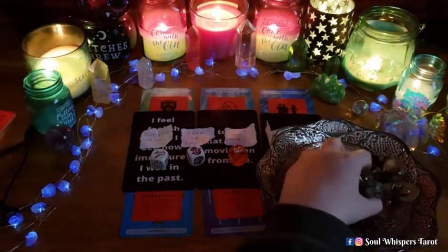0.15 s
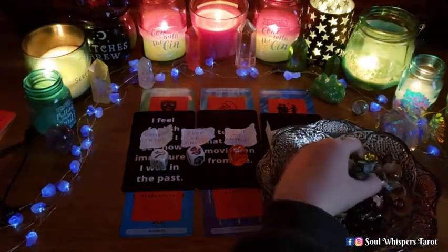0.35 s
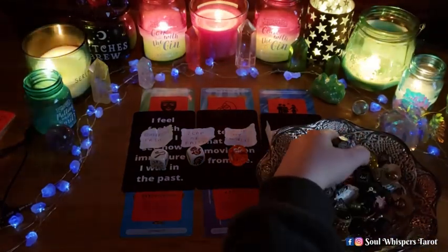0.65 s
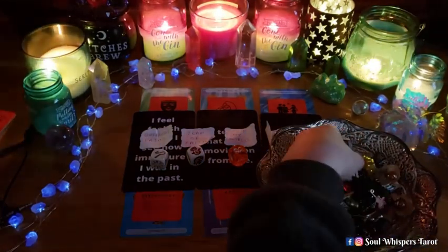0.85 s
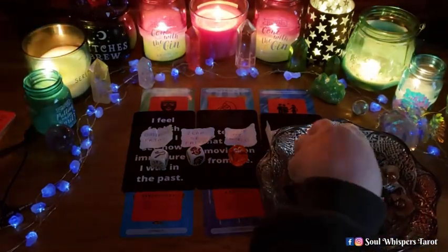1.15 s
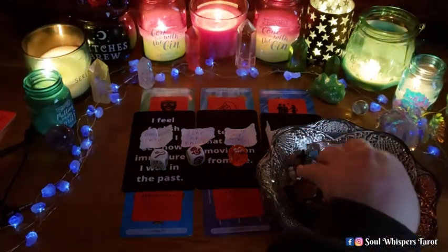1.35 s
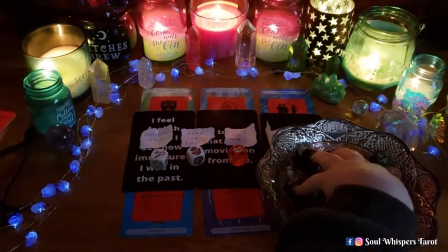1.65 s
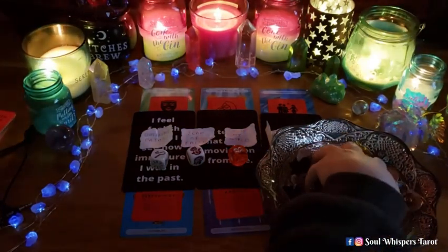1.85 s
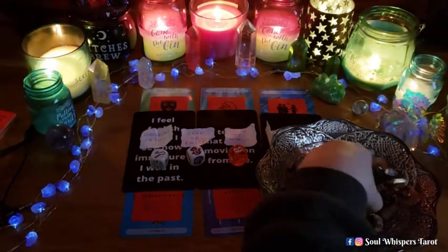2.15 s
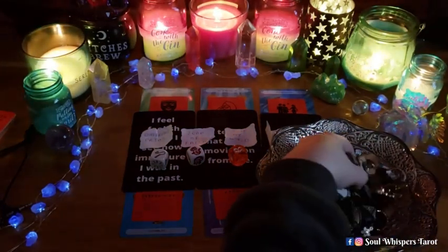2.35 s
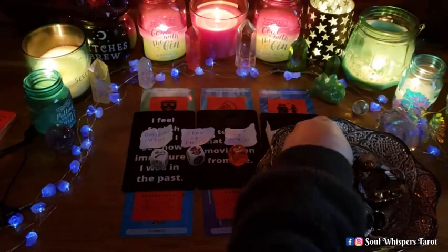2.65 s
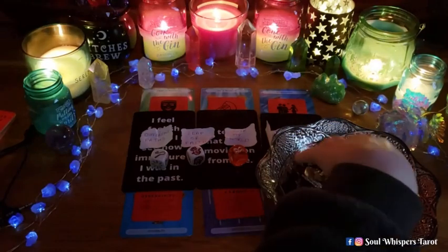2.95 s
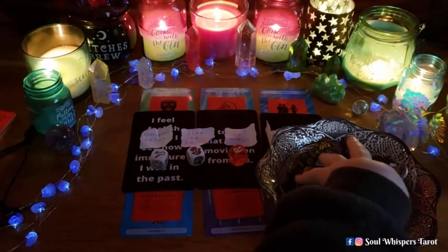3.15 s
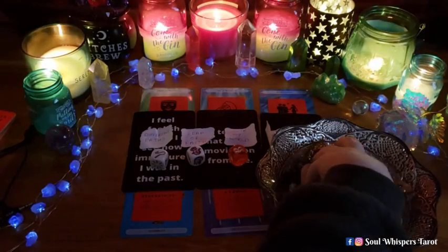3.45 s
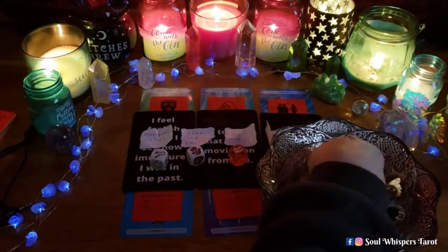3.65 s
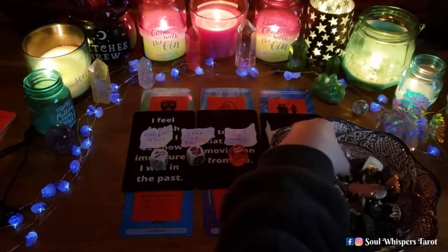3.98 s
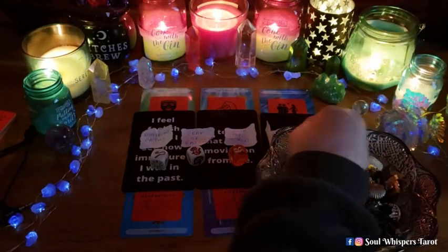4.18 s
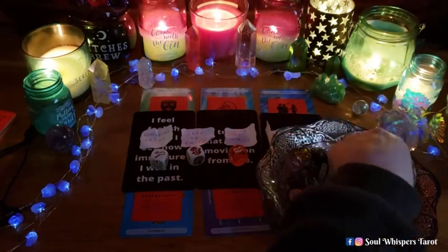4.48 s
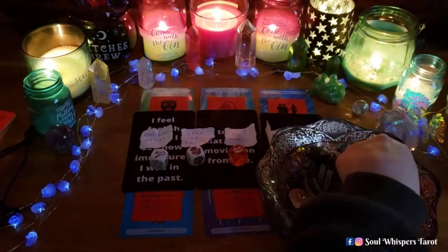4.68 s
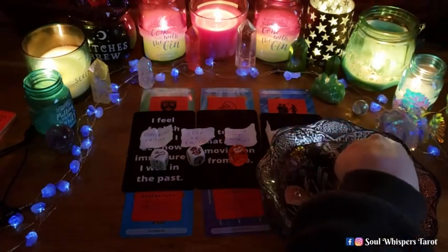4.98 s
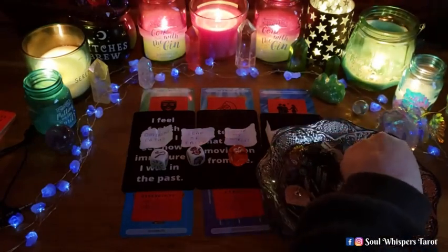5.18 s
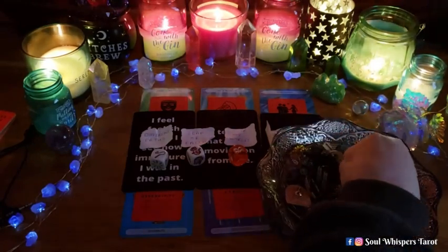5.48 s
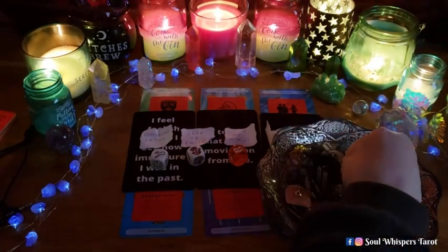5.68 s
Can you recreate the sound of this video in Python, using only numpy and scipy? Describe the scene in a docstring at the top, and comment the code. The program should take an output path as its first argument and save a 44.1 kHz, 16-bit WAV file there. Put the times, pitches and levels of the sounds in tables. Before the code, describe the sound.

Crisp, dense tinkling of tiny trinkets being stirred starts at once, loud, then dips around half a second and again near one and a half. Strokes keep returning, with single knocks, short rattles and scraping bead clinks over clacking stones and a soft wooden thud. After about four and a half seconds it thins to lighter fidgeting. Recorded close in stereo, stronger on the left, dry little room with faint hiss.

```python
"""Tinkling charms and clacking stones: a hand stirs them in a glass bowl on a wooden table, close to
a stereo microphone. Scattered tiny knocks excite short bundles of modes in charms and stones, the
bowl's ringing modes and the table's rumble; charms jingle and rattle, hollow beads scrape, and
single stronger knocks ring out. The bowl stands nearer the left port, in a small quiet room."""
import sys
import numpy as np
from scipy import signal
from scipy.fft import rfft, irfft, next_fast_len
from scipy.io import wavfile

SR = 44100
rng = np.random.default_rng(int(sys.argv[2]) if len(sys.argv) > 2 else 0)


def amplitude_ratio(level_db):
    """Convert a level in decibels to the matching linear amplitude (field) ratio."""
    exponent = np.asarray(level_db, float) / 20
    return 10 ** exponent


def transcribe(u):
    """Save the signal u as a 16-bit wav file named by the first command-line argument.

    u: samples, shape (n,) or (channels, n), limited to [-1, 1]; the rate is SR.
    q: integer samples, one column per channel.
    """
    v = np.clip(np.atleast_2d(u).T, -1, 1)
    q = np.round(v * 32767).astype(np.int16)
    wavfile.write(sys.argv[1], SR, q)


N = 256662  # length in samples

# Room and microphone noise. Each row: frequency in Hz, relative level in dB per Hz.
HUSH_SPECTRUM = [(30, -14.5), (121, 1.5), (526, -20), (4650, -25.5), (16000, -21)]
HUSH_DB = -62.5  # over both ports together, before the left one is favoured
# How alike the two ports hear a noise. Each row: frequency in Hz, likeness from 0 to 1.
PORT_LIKENESS = [(60, 0.73), (240, 0.86), (950, 0.06), (3770, 0.0091), (15000, 0.03)]
# The bowl stands nearer the left port. Each row: frequency in Hz, left minus right in dB.
LEFT_LEAD = [(60, 12), (180, 9.5), (550, 10), (1650, 7.5), (4970, 5), (15000, 12.5)]

# Pushes of the hand through the heap. Each row: time of the height in seconds, charm level in dB,
# swell before it in seconds, carry after it in seconds, stones moved in dB relative to the charms.
PUSHES = [(0.0, -15.5, .01, 0.08, -11.5), (0.132, -14.5, 0.0068, 0.016, -14), (0.339, -20, 0.17, 0.15, -12),
          (0.544, -29, 0.0037, 0.092, -8), (.70, -34, 0.051, 0.098, -12.5),
          (0.9, -20.5, 0.11, 0.048, -13.5), (1.084, -15.5, 0.11, 0.028, -11.5),
          (1.199, -25.5, 0.005, 0.0052, -12.5), (1.621, -25, 0.072, 0.12, -9), (1.78, -24, 0.11, 0.055, -9),
          (1.938, -19, 0.11, 0.022, -11), (2.019, -21.5, 0.017, 0.069, -9),
          (2.19, -19.5, 0.1, 0.058, -12.5), (2.342, -23, 0.13, 0.13, -10.5),
          (2.57, -30.5, 0.056, 0.022, -7.5), (2.604, -22, 0.0054, 0.0078, -15),
          (2.642, -21.5, 0.0055, 0.034, -11.5), (2.74, -21, 0.0065, .05, -18),
          (2.849, -15.5, 0.056, 0.1, -15.5), (3.063, -38.5, 0.0075, 0.0024, -13),
          (3.199, -21.5, 0.059, 0.38, -10.5), (3.434, -22.5, 0.038, 0.15, -12),
          (3.684, -20, 0.086, 0.042, -12), (3.851, -21, 0.1, 0.29, -11.5), (4.102, -16, 0.052, 0.12, -18),
          (4.273, -24.5, 0.0056, 0.04, -10), (4.43, -44.5, 0.0038, 0.091, 4),
          (4.59, -22.5, 0.11, 0.12, -11.5), (4.745, -26.5, 0.038, 0.11, -10), (4.92, -30, 0.1, 0.099, -9.5),
          (5.118, -34.5, 0.075, 0.04, -7), (5.258, -28, 0.062, 0.029, -10.5),
          (5.39, -28, 0.023, 0.0078, -10.5), (5.471, -39, 0.031, 0.046, -7.5),
          (5.579, -36.5, 0.046, 0.0087, -9), (5.659, -25.5, 0.062, 0.012, -13),
          (5.759, -32, 0.0055, 0.0059, -14)]
ATTACK_DB_PER_S, SWELL_DB_PER_S, SAG_DB_PER_S = 1296, 54.5, 51.5  # setting in, swelling, carrying on
# coming to rest after a push
CHARM_STOP_DB_PER_S, STONE_STOP_DB_PER_S, TABLE_STOP_DB_PER_S = 287.5, 208.5, 175.5

# Colour of the charms. Each row: frequency in Hz, relative level in dB per Hz.
CHARM_SPECTRUM = [(2650, -21.5), (4500, -6.5), (5210, -13), (6450, -4), (7320, -11), (9310, -3.5),
                  (11700, -1.5), (15700, -3.5)]
# Colour of stones on glass. Each row: frequency in Hz, relative level in dB per Hz.
CLACK_SPECTRUM = [(240, -78.5), (400, -4.5), (781, -6), (1280, -1.5), (1410, -7), (1700, -1), (2010, -7.5),
                  (4470, -1), (5500, -7), (7150, -41.5)]
# Mode pitches of the glass bowl. Each entry: frequency in Hz.
BOWL_HZ = [1085, 1253, 1726, 2820, 3010, 4386, 6035, 7875, 8547, 9424, 10310, 11740]
# The same bowl modes. Each row: relative level in dB, undamped 60 dB decay time in seconds.
BOWL_RINGS = [(-27.5, 0.32), (-17.5, 0.13), (-8, 0.088), (-11.5, 0.066), (-4.5, 0.057), (-4, .1),
              (-13, 0.13), (-9.5, 0.063), (-9.5, 0.042), (-5, 0.11), (-3, 0.098), (-1.5, 0.11)]
# Modes of the table top. Each row: frequency in Hz, relative level in dB, 60 dB decay time in seconds.
TABLE_MODES = [(109, -4, 0.14), (123, 2, 0.086), (187.9, 2.5, 0.12), (229, -10.5, 0.046), (364.2, -5, 0.15),
               (442, 1, 0.076), (561.2, -6.5, 0.21)]
DEEP_HZ = 150  # modes below this are driven by the wrist
# The wrist leans on the table. Each row: time in seconds, relative drive of the deepest modes in dB.
WRIST_LEAN = [(0, -9), (.9, 0.5), (1.6, -3), (3.0, 1.5), (4.0, 1), (5.2, -1), (5.802, 5)]

# Single knocks. Each row: time in seconds, strength in dB, pitch of the struck piece in Hz,
# its ring in dB relative to the strength, blow on the glass in dB relative to the strength.
KNOCKS = [(0.1263, -3.5, 4385, -6, -4.5), (0.27, -11.5, 4385, -4, -6.5), (1.074, 3.5, 10470, -13.5, -19),
          (1.198, -14.5, 13040, -1, -33), (1.269, -16, 2820, -23, -16.5), (1.506, -39.5, 14200, -24.5, -18),
          (1.615, -13.5, 4323, -13, -6.5), (2.017, -8, 4387, -7, -3.5), (2.6017, -12, 9650, -5, -24),
          (2.639, 6.5, 7010, -27, -33), (2.7356, -2.5, 13600, -14, -20), (2.8022, -1.5, 13700, -13, -17.5),
          (3.052, -28, 13200, -16, -29), (3.19, -4.5, 13200, -14, -28), (4.051, -3.5, 13300, -11, -37),
          (4.2707, -25.5, 1117, -5, 1.5), (4.394, -38.5, 4440, -9, 4), (4.4265, -21.5, 4230, -22, -6),
          (5.7543, -12, 15050, -9, -49)]
# One charm rattling for a while. Each row: start in seconds, end in seconds, frequency in Hz,
# 60 dB decay time in seconds, level in dB relative to the charms' stirring curve.
RATTLES = [(.5375, .546, 8850, .02, 9), (.64, .69, 11140, .12, 6), (.713, .75, 11140, .12, 1.5),
           (3.822, 3.85, 4386, .04, -9), (1.04, 1.14, 9140, 0.018, -6.5), (1.075, 1.15, 6330, 0.028, -5),
           (2.3, 2.46, 14640, 0.025, -5.5), (2.6, 2.67, 7180, 0.013, -4), (2.735, 2.81, 7020, 0.014, -6),
           (2.9, 3.03, 10320, 0.045, -12), (4.052, 4.2, 6960, 0.012, -10), (4.15, 4.26, 13280, .03, -5),
           (5.752, 5.79, 14800, .04, -3.5)]
# Hollow beads scraping under the hand. Each row: start in seconds, end in seconds,
# middle pitch in Hz, strongest clink in dB relative to the charms' stirring curve.
BEAD_SPELLS = [(0.568, .72, 4190, -9.5), (.86, 0.962, 3890, -9), (2.169, 2.474, 3725, -8.5),
               (2.686, 2.731, 3790, -7.5), (3.41, 3.53, 3816, -7.5), (3.534, 3.85, 3910, -10.5),
               (3.92, 3.989, 3800, -11), (4.487, 4.65, 3780, -7), (4.669, 4.95, 3670, -13),
               (5.589, 5.704, 3660, -12)]


def rms_one(x):
    """Scale to rms 1."""
    return x / np.sqrt(np.mean(x ** 2) + 1e-20)


def at_hz(points, hz):
    """Read a spectrum on a log-frequency axis."""
    table_hz, values = np.array(points).T
    return np.interp(np.log(np.maximum(hz, 1)), np.log(table_hz), values)


def coloured(x, spectrum):
    """Weight a sound by a spectrum in dB."""
    size = next_fast_len(N + 4096)
    gain = amplitude_ratio(at_hz(spectrum, np.fft.rfftfreq(size, 1 / SR)))
    return irfft(rfft(x, size) * gain, size)[..., :N]


def pair(size):
    """Noise at two ports, as spectra: mid and side are weighted by the ports' likeness at each pitch."""
    mid, side = rfft(rng.standard_normal((2, size)))
    alike = np.clip(at_hz(PORT_LIKENESS, np.fft.rfftfreq(size, 1 / SR)), 0, 1)
    return np.sqrt(1 + alike) * mid + np.sqrt(1 - alike) * side * [[1], [-1]]


def hush():
    """Steady coloured noise of room and microphone, stronger at the left port."""
    noise = rms_one(coloured(irfft(pair(N), N), HUSH_SPECTRUM))
    return amplitude_ratio(HUSH_DB) * noise * amplitude_ratio([[3.0], [-3.0]])


def stirring(peaks_db, stop_db_per_s):
    """Each push sets in fast, swells, sags while it carries on, then stops; pushes add in power."""
    s, _, swell, carry, _ = np.transpose(PUSHES)[:, :, None]
    late = np.arange(0, N + 64, 64) / SR - s
    before = SWELL_DB_PER_S * np.clip(-late, 0, swell) + ATTACK_DB_PER_S * np.maximum(-late - swell, 0)
    after = SAG_DB_PER_S * np.clip(late, 0, carry) + stop_db_per_s * np.maximum(late - carry, 0)
    power = np.sum(amplitude_ratio(peaks_db[:, None] - before - after) ** 2, axis=0)
    level_db = 10 * np.log10(power + 1e-12)
    return np.interp(np.arange(N) / 64, np.arange(len(power)), level_db)


def steady(make, level_db):
    """Play a linear body with its clicks scaled by a level curve, so that rings outlast the stroke."""
    state = rng.bit_generator.state
    loudness = np.sqrt(np.mean(make(1) ** 2))
    rng.bit_generator.state = state  # the same draws again, now under the curve
    return make(amplitude_ratio(level_db)) / loudness


def contacts(per_s, spread_db):
    """Random tiny knocks of very unequal size; rms 1."""
    sizes = amplitude_ratio(spread_db * np.minimum(rng.exponential(1, N), 5)) * rng.choice([-1, 1], N)
    return rms_one(sizes * (rng.random(N) < per_s / SR))


def wander(per_s, spread_db):
    """A gain that drifts at random."""
    steps = rng.standard_normal(400)
    return amplitude_ratio(spread_db * np.interp(np.arange(N) / SR * per_s, np.arange(len(steps)), steps))


def heap(clicks, t60, snap, count, patchy_db=0):
    """Knocks are dealt to small objects, each with its own colour and busy spells:
    a sharp snap, then a dense bundle of quickly dying modes."""
    dealt = rng.integers(0, count, N)
    t = np.arange(4096) / SR
    bands = np.linspace(0, 24, len(t) // 2 + 1)
    decay = amplitude_ratio(-60 * t / t60) + snap * amplitude_ratio(-60 * t / 0.00065)
    out = 0
    for k in range(count):
        colour = amplitude_ratio(patchy_db * np.interp(bands, np.arange(25), rng.standard_normal(25)))
        body = irfft(pair(len(t)) * colour) * decay
        body = rms_one(body) / np.sqrt(len(t))
        busy = clicks * (dealt == k) * wander(14, patchy_db)
        out = out + signal.fftconvolve(busy[None], body, axes=1)[:, :N]
    return out


def charm_tinkle(level_db):
    """Tiny knocks among the charms excite twelve bright bodies."""
    def make(gain):
        clicks = gain * contacts(900, 1.3)
        return coloured(heap(clicks, 0.1, 2.7, count=12, patchy_db=2.0), CHARM_SPECTRUM)
    return steady(make, level_db)


def stone_clack(level_db):
    """Tiny knocks of stones on the glass excite fourteen bodies, more unevenly than the charms."""
    def make(gain):
        clicks = gain * contacts(900, 2.37)
        return coloured(heap(clicks, 0.096, 1.2, count=14, patchy_db=4.0), CLACK_SPECTRUM)
    return steady(make, level_db + 4.0)


def ring(clicks, hz, t60):
    """A unit click sets a damped sine of starting height 1 ringing."""
    r, w = amplitude_ratio(-60 / (max(t60, .005) * SR)), 2 * np.pi * hz / SR
    return signal.lfilter([0, np.sin(w)], [1, -2 * r * np.cos(w), r * r], clicks + 1e-18)


def struck(clicks, modes, max_lag_s):
    """Every mode rings; it reaches the left port up to a quarter cycle late."""
    out = np.zeros((2, N))
    for hz, level_db, t60 in modes:
        tone = amplitude_ratio(level_db) * ring(clicks(), hz, t60)
        lag = round(SR * min(max_lag_s, 1 / (4 * hz)))
        out += [np.pad(tone, (lag, 0))[:N], tone]
    return out


def bowl(damping):
    """The bowl's modes as (Hz, dB, t60 s); the heap sliding on the glass shortens the rings."""
    return [(hz, db, t60 * damping) for hz, (db, t60) in zip(BOWL_HZ, BOWL_RINGS)]


def stirred_glass(level_db):
    """Drifting streams of knocks keep the damped bowl modes ringing."""
    def make(gain):
        return struck(lambda: gain * contacts(300, 1.7) * wander(7, 6.0), bowl(0.75), .0003)
    return steady(make, level_db + 0.5)


def table_rumble(level_db):
    """Knocks drive the upper modes of the table top; the leaning wrist drives the deepest."""
    deep = [mode for mode in TABLE_MODES if mode[0] < DEEP_HZ]
    high = [mode for mode in TABLE_MODES if mode[0] >= DEEP_HZ]

    def make_high(gain):
        return struck(lambda: gain * contacts(600, 4.0) * wander(9, 2.5), high, 0.0003)

    def make_deep(gain):
        return struck(lambda: gain * contacts(300, 2.4), deep, 0.0003)

    rumble = steady(make_high, level_db - 1.5)
    lean_db = level_db - 6.0 + np.interp(np.arange(N) / SR, *np.transpose(WRIST_LEAN))
    return rumble + steady(make_deep, lean_db)


def rattles(rows, level_db, per_s):
    """A run of uneven clicks keeps one short mode ringing; the right port hears it up to 0.9 ms late."""
    out = np.zeros((2, N + 4100))
    for start, end, hz, t60, db in rows:
        span = slice(round(start * SR), min(round(end * SR), N))
        clicks = rng.standard_normal(SR) * (rng.random(SR) < per_s / SR) * np.sqrt(SR / per_s)
        clicks[0] = np.sqrt(SR / per_s)  # the run opens with a click
        clicks = clicks[:span.stop - span.start] * amplitude_ratio(level_db[span] + db)
        clicks = np.pad(clicks, (0, 4000))  # room to ring out
        tone = ring(clicks, hz, t60) / np.sqrt(t60 * SR / 28)  # rms of a ring fed by unit noise
        lag = rng.integers(0, 40)
        out[0, span.start:span.start + len(tone)] += tone
        out[1, span.start + lag:span.start + lag + len(tone)] += tone
    return out[:, :N]


def jingles(level_db, jingle_db, count):
    """Many loose charms rattle briefly, each at a pitch of its own."""
    when, pitch, size, life, run = rng.random((count, 5)).T
    hz = 5000 + 10600 * pitch
    start = when * (N / SR - .01)
    end = start + .02 + .12 * run
    t60 = .01 + .06 * life
    db = jingle_db + at_hz(CHARM_SPECTRUM, hz) - 8.0 * size
    return rattles(zip(start, end, hz, t60, db), level_db, 300)


def room(x, t60):
    """A short dull tail of decaying noise, its own at each port."""
    t = np.arange(int(.4 * SR)) / SR
    tail = rng.standard_normal((2, len(t))) * amplitude_ratio(-60 * t / t60) * (t > .004)
    tail = signal.lfilter([.5], [1, -.5], tail) / np.sqrt(t60 * SR / 14)
    return signal.fftconvolve(x, tail, axes=1)[:, :N]


def placed_left(near):
    """Nearer the left port: half the level difference is given to one port and taken from the other."""
    lead = np.array(LEFT_LEAD)
    return np.array([coloured(near[0], lead * [1, .5]), coloured(near[1], lead * [1, -.5])])


def ping(s, peak, hz, t60, phase):
    """A piece rings with its close twin mode; the ports hear it in different phase."""
    t = np.arange(min(8000, N - round(s * SR))) / SR
    turn = np.array([[0], [phase]])
    tone = np.sin(2 * np.pi * hz * t + turn) + 0.57 * np.sin(2 * np.pi * hz * 1.006 * t - turn)
    return peak * tone * amplitude_ratio(-60 * t / t60) * (1 - np.exp(-t / .0015))


def knocks():
    """Each knock rings one piece, cracks, and bounces on the glass."""
    rings, crack, blows = np.zeros((2, N)), np.zeros(N), np.zeros(N)
    phases = rng.uniform(1, 2, len(KNOCKS))
    for (s, peak_db, hz, ring_db, glass_db), phase in zip(KNOCKS, phases):
        at = round(s * SR)
        t60 = 0.17 * min(hz / 4400, 4400 / hz) ** 0.27
        tone = ping(s, amplitude_ratio(peak_db + ring_db), hz, t60, phase)
        rings[:, at:at + tone.shape[1]] += tone
        crack[at] = amplitude_ratio(peak_db)
        # gentler blows stay in contact longer and sound duller
        touch = np.hanning(2 + max(1, round(SR * .00005 * amplitude_ratio(-.3 * peak_db))))
        touch_times = np.cumsum([0, *rng.uniform(.004, .012, 2)])  # the piece bounces twice
        for bounce, late in enumerate(touch_times):
            blow = amplitude_ratio(peak_db + glass_db - 4.8 * bounce) * touch / touch.sum()
            blows[at + round(late * SR):][:len(touch)] += blow

    def uneven_blows():
        """Each bowl mode takes up the blows a little differently."""
        return blows * np.repeat(amplitude_ratio(rng.normal(0, 3.0, N // 128 + 1)), 128)[:N]

    glass = struck(uneven_blows, bowl(1), .0003)
    clack = coloured(heap(blows, 0.3, 9.0, count=1), CLACK_SPECTRUM)
    cracks = coloured(heap(crack, 0.05, 3.0, count=4), CHARM_SPECTRUM)
    return rings + amplitude_ratio(-1.0) * glass + amplitude_ratio(18.0) * clack + amplitude_ratio(11.0) * cracks


def charm_rattles(level_db):
    """Single charms rattle for a while, each run of clicks feeding one mode."""
    return rattles(RATTLES, level_db, 1100)


def beads(level_db):
    """Each spell is a scatter of short clinks, every one at its own pitch near the spell's."""
    clinks_per_s, pitch_spread, middle_t60_s = 260, 0.071, 0.018  # at most 80 clinks a spell
    rows = []
    for start, end, hz, db in BEAD_SPELLS:
        draws = np.column_stack([rng.random((80, 3)), rng.standard_normal(80)])
        for when, run, size, pitch in draws[:round(clinks_per_s * (end - start))]:
            s = start + when * (end - start)
            clink_hz = hz * np.exp(pitch_spread * pitch)
            rows.append((s, s + .005 + .02 * run, clink_hz, middle_t60_s * (.5 + run), db - 9.7 * size))
    return rattles(rows, level_db, 650)


def scene():
    """Charms, stones, beads, bowl and table, placed to the left, in the room."""
    _, charms_db, _, _, stones_db = np.transpose(PUSHES)
    tinkle_db = stirring(charms_db, CHARM_STOP_DB_PER_S)
    clack_db = stirring(charms_db + stones_db, STONE_STOP_DB_PER_S)
    rumble_db = stirring(charms_db + stones_db, TABLE_STOP_DB_PER_S) - 3
    near = charm_tinkle(tinkle_db) + stone_clack(clack_db) + stirred_glass(clack_db)
    near = near + table_rumble(rumble_db) + jingles(tinkle_db, -9.5, count=600)
    near = near + knocks() + charm_rattles(tinkle_db) + beads(tinkle_db)
    near = near + amplitude_ratio(-6.5) * room(near, 0.23)
    return placed_left(near) + hush()


def roll_off(x):
    """The treble ends steeply here."""
    return signal.sosfilt(signal.butter(12, 16810, fs=SR, output="sos"), x)


def record(dry):
    """The microphone drops the deepest bass; peaks are rounded, the top is cut steeply."""
    low_cut_hz, top_cut_hz = 68, 15720
    bass_cut = signal.sosfilt(signal.butter(3, low_cut_hz, "high", fs=SR, output="sos"), dry)
    rounded = 1.6 * np.tanh(bass_cut / 1.6)
    top_cut = signal.sosfilt(signal.ellip(14, .5, 75, top_cut_hz, fs=SR, output="sos"), rounded)
    return roll_off(np.clip(top_cut, -1, 1))


dry = scene()
out = record(dry)
transcribe(out)
```